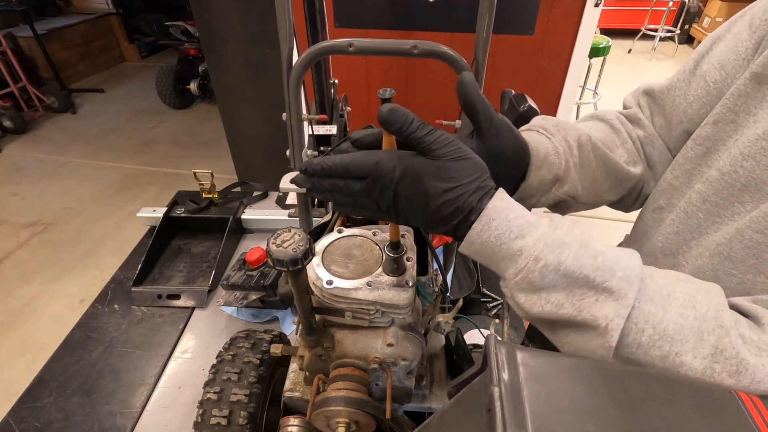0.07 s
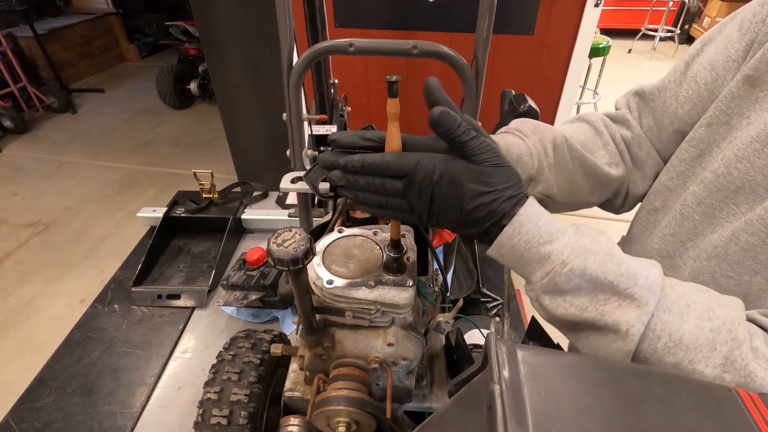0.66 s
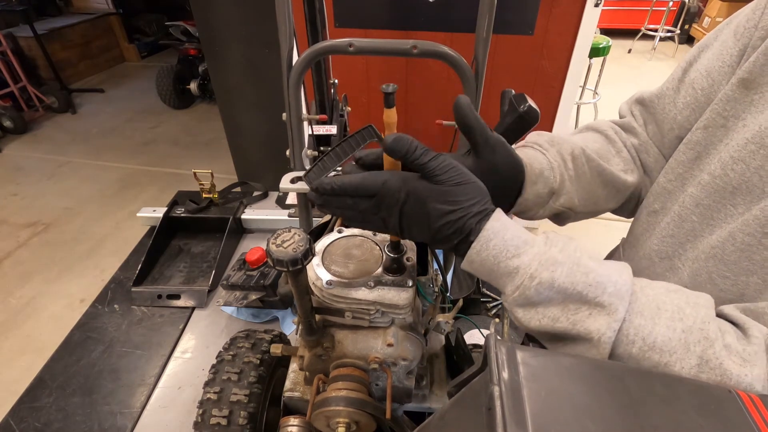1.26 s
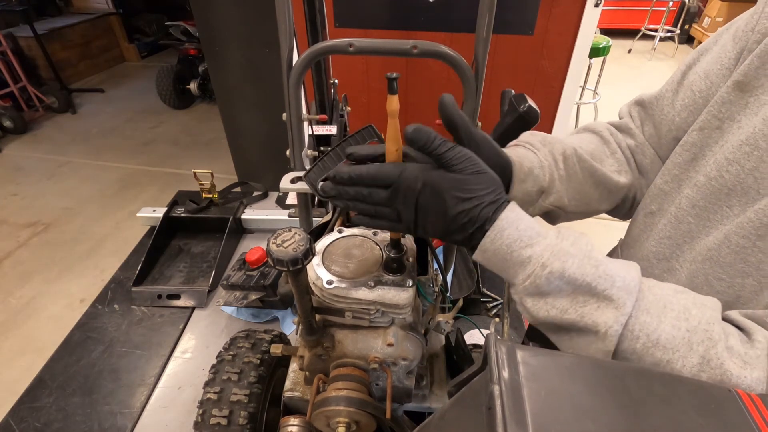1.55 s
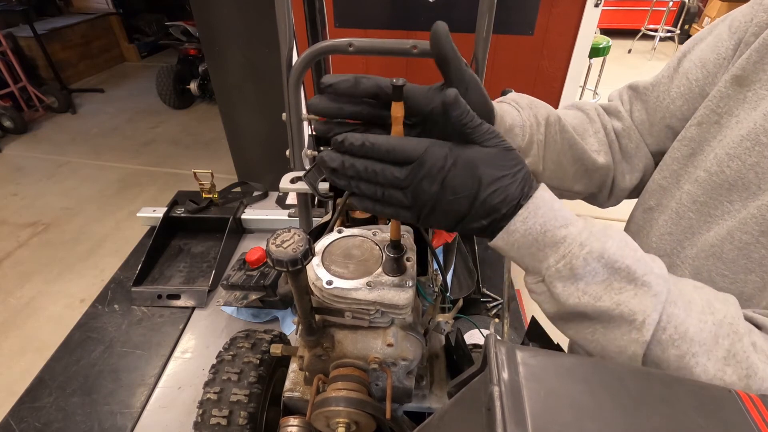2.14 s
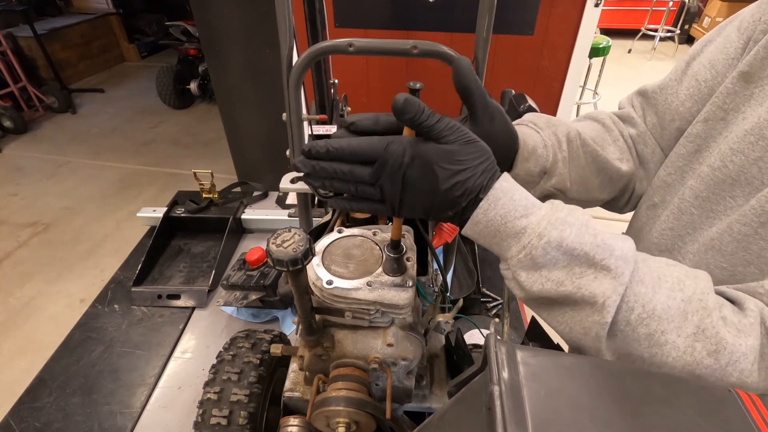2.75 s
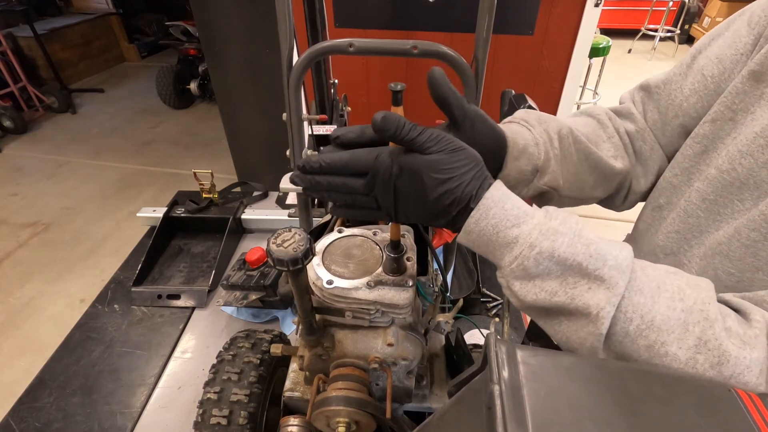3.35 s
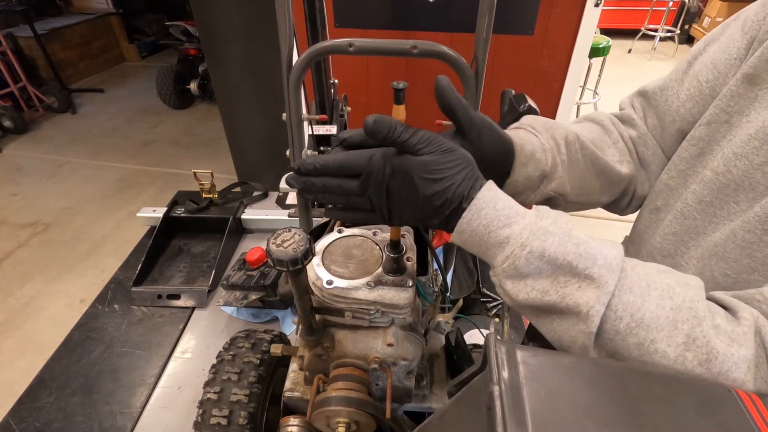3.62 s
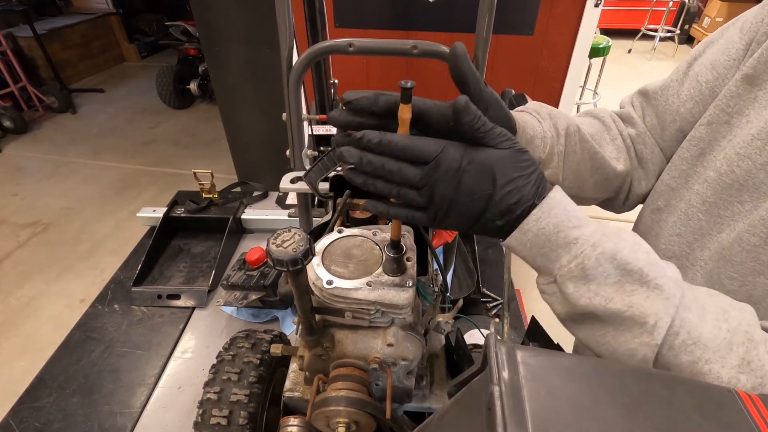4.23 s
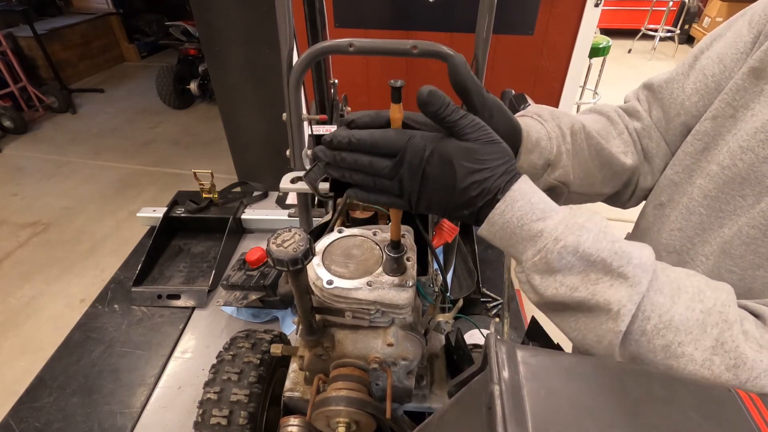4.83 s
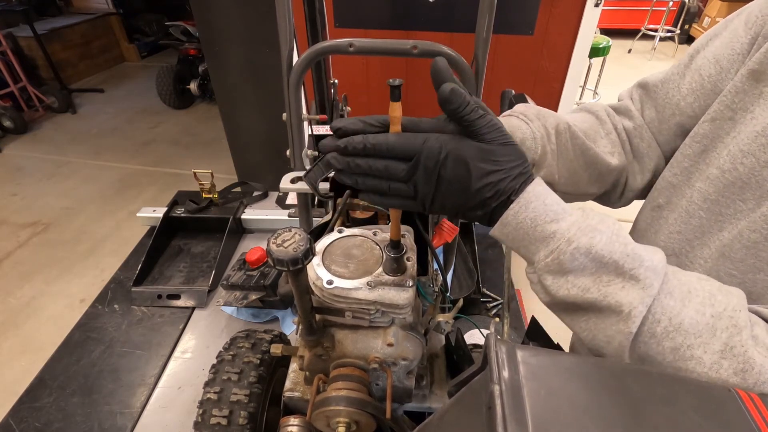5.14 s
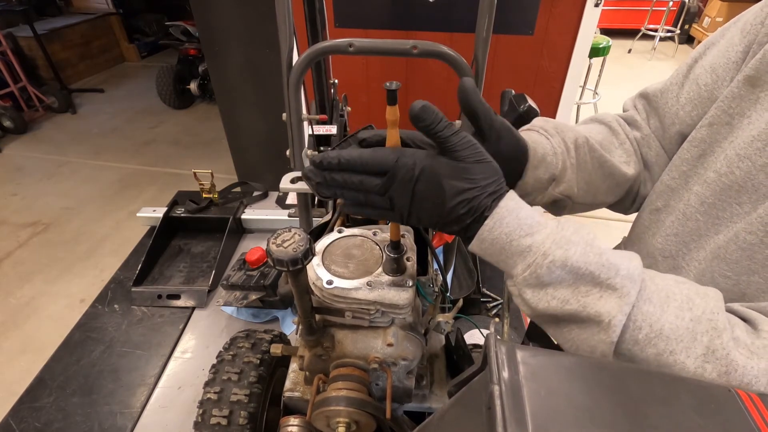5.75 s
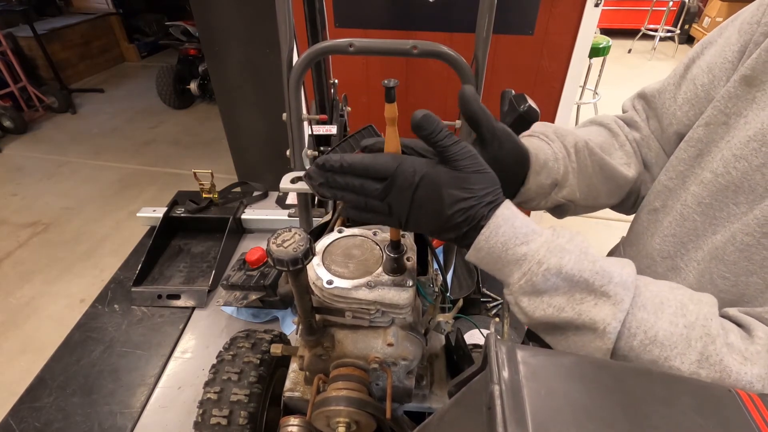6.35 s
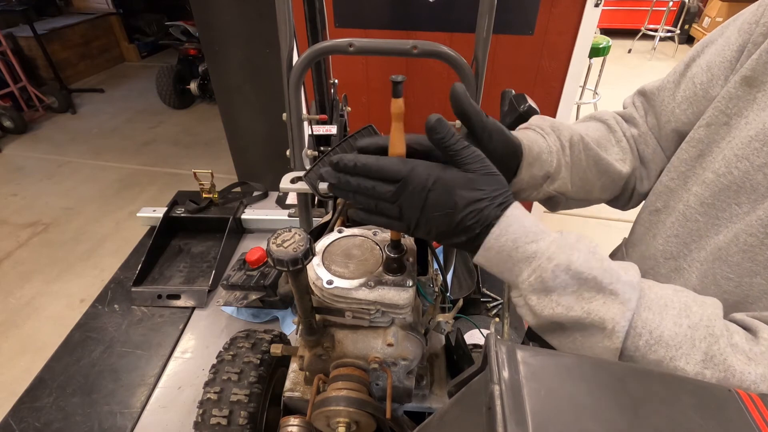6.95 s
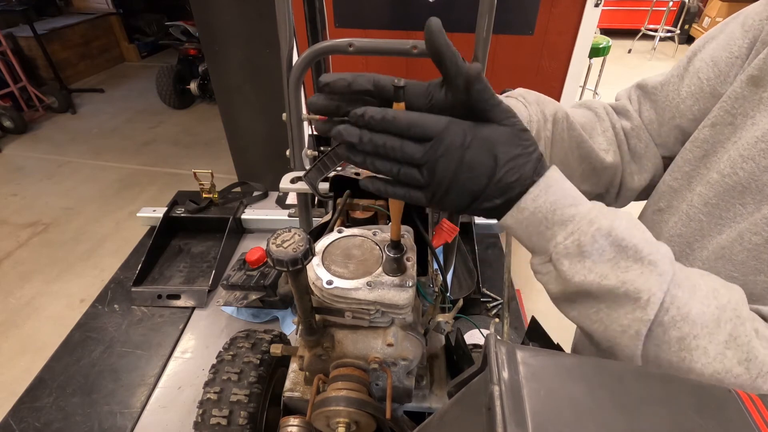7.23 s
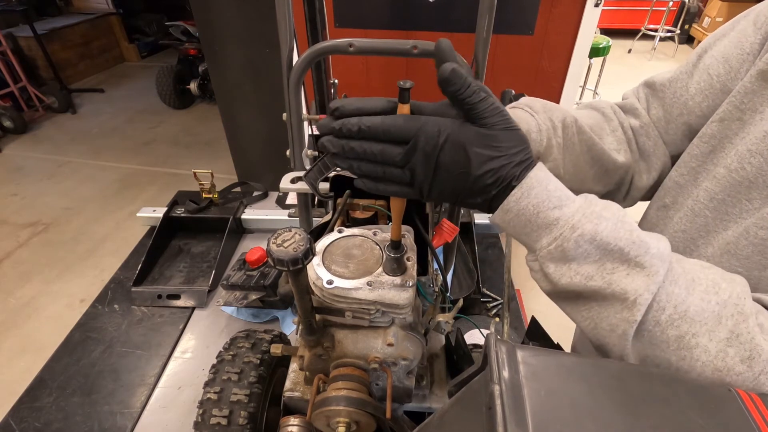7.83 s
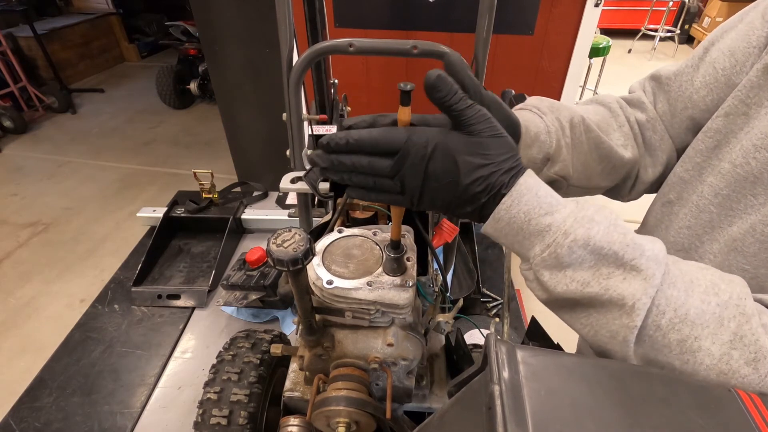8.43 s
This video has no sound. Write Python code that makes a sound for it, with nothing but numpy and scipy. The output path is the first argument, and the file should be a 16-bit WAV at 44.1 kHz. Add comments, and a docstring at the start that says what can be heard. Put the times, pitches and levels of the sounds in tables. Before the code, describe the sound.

An engine valve is ground by hand against its seat, close to the microphone in a quiet workshop. Gritty metallic scraping goes back and forth at about eight or nine strokes a second, ringing slightly in the engine block. It starts fairly smooth, with a soft low knock and faint rumble of the rocking machine around 1 second, and stops at 2 seconds. A few light ticks and a sharper click lead into coarser, brighter grinding from 2.6 seconds, which gradually wears finer. A second pause at about 4.1 seconds holds small ticks. The scraping returns at 4.6 with a soft crunch and faint high squeak, smoothing out until 7.1. After more ticks and another small crunch, sharp grinding resumes at 7.6 and continues to the end, near 8.7 seconds. Gloves rustle very faintly in the pauses, with a short room tail and slight hiss behind.

```python
"""Gritty to-and-fro scraping, close to a stereo microphone in a workshop: an engine valve lapped by hand.
A stick spun between the palms turns the valve; each stroke drags grinding compound over the seat and
rings the engine block, and the grit wears finer through a spell. In three short breaks the valve is
lifted and reseated with small ticks, then crunches and squeaks on fresh grains. Underneath, the machine
rocks under the hands; behind it are the room's short tail and a faint hiss."""
import sys
import numpy as np
from scipy import signal
from scipy.fft import rfft, irfft, next_fast_len
from scipy.io import wavfile
from scipy.ndimage import uniform_filter1d, map_coordinates

SR = 44100
rng = np.random.default_rng(int(sys.argv[2]) if len(sys.argv) > 2 else 0)


def wav_out(sig):
    """Save sig, one row per channel (or a flat mono array), as 16-bit PCM at SR to the path in sys.argv[1]."""
    wavfile.write(sys.argv[1], SR, np.round(np.clip(np.atleast_2d(sig).T, -1, 1) * 32767).astype(np.int16))


N = 382347


def amp(db):
    return 10 ** (np.asarray(db) / 20)


def unit_rms(x):
    return x / np.sqrt(np.mean(x ** 2) + 1e-20)


def along(points, hz):
    """Read (freq_hz, value) points at hz, on a log frequency axis."""
    freqs, values = np.transpose(points)
    return np.interp(np.log(hz + 1), np.log(freqs + 1), values)


def filtered(x, response):
    """Pass x through a response given as a function of frequency."""
    size = next_fast_len(N + SR // 2)
    return irfft(rfft(x, size) * response(np.fft.rfftfreq(size, 1 / SR)), size)[..., :N]


def coloured(x, spectrum):
    """Shape x by (freq_hz, gain_db) points."""
    return filtered(x, lambda hz: amp(along(spectrum, hz)))


def noise(spectrum):
    """Coloured noise of rms 1."""
    return unit_rms(coloured(rng.standard_normal(N), spectrum))


def wobble(rate):
    """A smooth random curve, rate knots a second."""
    return map_coordinates(rng.standard_normal(int(N * rate / SR) + 4), [np.arange(N) * rate / SR])


def add(track, start_s, sound):
    """Mix a sound in from start_s."""
    start = round(start_s * SR)
    sound = sound[max(-start, 0):]
    part = track[max(start, 0):][:len(sound)]
    part += sound[:len(part)]


def gestures(rows, attack_s, release_share=0.51):
    """Gain for (start_s, length_s, level_db) rows: each rises, holds and dies over a share of its length."""
    t = np.arange(N) / SR
    return sum(amp(db) * np.interp(t - s, [-attack_s, 0, length, length * (1 + release_share)], [0, 1, 1, 0])
               for s, length, db in rows)


# The workshop's steady background: freq_hz, level_db
ROOM_TONE = [(25, -3.5), (200, 0), (400, -13), (800, -14.5), (1500, -10), (3000, -21.5), (8000, -29.5),
             (11000, -39), (15000, -53)]
def room_tone():
    """A faint low rush and hiss all round the microphone, partly shared by both channels."""
    hiss = unit_rms(coloured(rng.standard_normal((3, N)), ROOM_TONE))
    return amp(-71.0) * (hiss[0] + hiss[1:])


# Colour of the sound coming back from the room: freq_hz, gain_db
ROOM_COLOUR = [(200, -6.5), (2000, -11), (4000, -11.5), (7000, -11.5), (12000, -10)]
# Decay of the room: freq_hz, t60_s
ROOM_DECAY = [(200, 1), (1000, 0.56), (2500, 0.52), (6000, 0.61), (10000, 0.37), (14000, 0.4)]
def workshop_tail(source, hop=16384):
    """A smooth, diffuse room tail in which the treble dies first."""
    out = np.zeros((2, N))
    padded = np.pad(coloured(source, ROOM_COLOUR), (hop, 2 * hop))
    for start in range(0, N + hop, hop):
        hz, t, bins = signal.stft(rng.standard_normal((2, 2 * hop)), SR, nperseg=256)
        decay = amp(-60 * t / along(ROOM_DECAY, hz)[:, None])
        tail = signal.istft(bins * decay, SR, nperseg=256)[1]
        tail = tail + 0.41 * tail[::-1]  # each side hears some of the other
        piece = padded[start:start + 2 * hop] * np.sqrt(np.hanning(2 * hop))
        wet = signal.fftconvolve(piece[None], tail / np.linalg.norm(tail[0]), axes=1)
        for channel, sound in zip(out, wet[:, max(hop - start, 0):]):
            add(channel, max(start - hop, 0) / SR + 0.003, sound)
    return out


def near_reflections(source, count=8, span_s=0.0072):
    """Faint early copies of the treble, different on each side, widen the scraping."""
    echoes = np.zeros((2, int(span_s * SR)))
    for channel in echoes:
        signs = rng.choice([-1, 1], count)
        delays = rng.integers(len(channel) // 10, len(channel), count)
        channel[delays] = signs / np.sqrt(count)
    treble = coloured(source, [(1500, -7.5), (4000, 9.0), (8000, -2), (13000, 7.0)])
    return amp(-13.5) * signal.oaconvolve(treble[None], echoes, axes=1)[:, :N]


# Balance at the microphone: freq_hz, left_over_right_db
MIC_BALANCE = [(60, 1), (110, -2), (200, -3), (380, -3), (700, 0), (1290, -2), (2380, 1), (4400, 0),
               (8120, -0.5), (15000, -4.5)]
# Phase between its two sides: freq_hz, right_lead_rad
MIC_LEAD = [(100, 0.35), (300, 1), (800, 0.3), (2000, 0.57), (3300, 0.5), (5200, 0.95), (6800, 0.13),
            (15000, .05)]
def direct_path(source):
    """From close by, the sound reaches the right side of the microphone slightly earlier."""
    def response(hz):
        left = amp(along(MIC_BALANCE, hz) / 2) * np.exp(-0.5j * along(MIC_LEAD, hz))
        return np.array([left, 1 / left])
    return filtered(source, response)


# The hands push on the machine: start_s, length_s, sway_db, panel_db
PUSHES = [(0.024, .32, -65, -62), (.92, .06, -54.5, -69), (1.051, 0.062, -62, -47.5),
          (1.15, 0.74, -46, -69), (1.848, 0.15, -63, -63), (2.712, 0.17, -59.5, -61),
          (3.97, 0.16, -61.5, -74), (4.702, 0.1, -63.5, -66), (5.567, 0.059, -66, -67),
          (7.094, 0.15, -61, -70.5), (7.603, 0.33, -76, -66)]
# Rumble of the swaying machine: freq_hz, level_db
SWAY_SPECTRUM = [(15, -22), (33, -20.5), (39, 5.5), (45, -14.5), (70, -13), (100, -23), (200, -69),
                 (500, -120)]
# Drone of its panels: freq_hz, level_db
PANEL_SPECTRUM = [(30, -31), (80, -30), (130, -8), (175, 0), (216, -1), (250, -4), (330, -13.5),
                  (480, -14.5), (900, -26), (2500, -120)]
# Soft knocks on the frame: start_s, level_db
KNOCKS = [(0.062, -47), (.32, -46), (1.041, -36)]
# Resonances of the frame: pitch_hz, level_db, t60_s
FRAME_MODES = [(168, 7, 0.07), (216.8, 1, 0.36), (270, -5, 0.14), (375, -9, 0.27)]
def machine_rocking(sway_rest_db=-71.5, panel_rest_db=-69, push_attack_s=0.038, knock_rise_s=0.028):
    """Under the hands the machine sways, its panels drone faintly, and soft knocks ring the frame."""
    starts, lengths, sway_db, panel_db = np.transpose(PUSHES)
    sway = np.hypot(amp(sway_rest_db), gestures(zip(starts, lengths, sway_db), push_attack_s))
    panel = np.hypot(amp(panel_rest_db), gestures(zip(starts, lengths, panel_db), push_attack_s))
    out = sway * noise(SWAY_SPECTRUM) + panel * noise(PANEL_SPECTRUM)
    t = np.arange(SR // 2) / SR
    ring = sum(amp(db - 60 * t / t60) * np.sin(2 * np.pi * hz * t) for hz, db, t60 in FRAME_MODES)
    for start_s, level_db in KNOCKS:
        add(out, start_s, amp(level_db) * ring * (1 - np.exp(-t / knock_rise_s)))
    return out


# The gloves shift in each break: start_s, length_s, level_db
GLOVE_RUBS = [(2.41, 0.04, -67.5), (2.48, 0.089, -67), (4.465, 0.22, -72), (7.462, 0.023, -69.5),
              (7.51, .04, -75)]
def glove_rubs():
    """Gloves slide on the stick with a faint, uneven rustle."""
    rustle = noise([(100, -59), (600, -11), (2000, 3), (4500, -11), (9000, -8.5), (11000, -22), (14000, -39)])
    return rustle * amp(1.9 * wobble(90)) * gestures(GLOVE_RUBS, attack_s=0.0075)


# Broad response of the engine block: freq_hz, gain_db
BLOCK_RESPONSE = [(330, -31), (450, -26.5), (650, -23), (900, -16), (1250, -3.5), (1800, 1), (2800, -3.5),
                  (3400, -13.5), (4600, -19.5), (5500, -25), (6800, -25.5), (8000, -31.5), (11000, -39.5),
                  (15000, -43)]
# Resonances of block and valve: pitch_hz, width_hz, above_response_db
BLOCK_MODES = [(760.8, 11.8, 18.5), (902, 41, 15.5), (1022, 54, 13), (1294, 48, 5.5), (1454, 42, 5),
               (1626, 5.9, 11.5), (1748, 50, 10), (1846, 26, 8.5), (2007, 127, 10), (2258, 8.4, 11.5),
               (2470, 40, 8), (2663, 40, 6.5), (2878, 73, 6.5), (2990, 51, 11), (3180, 11, 10),
               (3613, 27, 12), (4027, 77, 10.5), (4414, 38, 13), (4532, 47, 12.5), (4830, 35, 12.5),
               (5060, 260, 8), (5923, 65, 15), (6280, 140, 11), (7042, 270, 9), (9400, 860, 13.5),
               (12120, 750, 11)]
def block_ring(low_hz, high_hz, size=8192, order=10):
    """The block's answer, of energy 1, to one grain that drives the given band."""
    hz = np.fft.rfftfreq(size, 1 / SR) + 1
    peaks = 1 + sum((amp(db) ** 2 - 1) / (1 + (2 * (hz - pitch) / width) ** 2)
                    for pitch, width, db in BLOCK_MODES)
    band = 1 / (1 + (low_hz / hz) ** order) / (1 + (hz / high_hz) ** order)
    gain = amp(along(BLOCK_RESPONSE, hz)) * np.sqrt(np.abs(peaks) * band)
    cepstrum = irfft(np.log(gain + 1e-6))
    cepstrum[1:size // 2] *= 2  # causal: it rings only after the blow
    cepstrum[size // 2 + 1:] = 0
    ring = irfft(np.exp(rfft(cepstrum)))
    return ring / np.linalg.norm(ring)


# Light contacts of valve and stick: start_s, peak_db, treble_db
TICKS = [(2.211, -63, 4), (2.299, -58, -17), (2.376, -45.5, -14), (2.426, -44.5, 7), (2.509, -55, -16),
         (2.561, -31, -12.5), (4.221, -43.5, -18), (4.562, -51, -5), (7.468, -50, 12), (7.506, -46, -11),
         (7.553, -37, -17)]
def valve_ticks(click_t60_s=0.008, skid_t60_s=0.11):
    """The valve touches down with a click and a short gritty skid, which ring the block."""
    out, t = np.zeros(N), np.arange(SR // 10) / SR
    body, edge = block_ring(430, 3600), block_ring(5300, 10000)
    envelope = 1.3 * amp(-60 * t / click_t60_s) + amp(-60 * t / skid_t60_s)
    for start_s, peak_db, treble_db in TICKS:
        contact = rng.standard_normal(len(t)) * envelope
        tick = signal.fftconvolve(contact, body + amp(treble_db) * edge)
        add(out, start_s, amp(peak_db) * tick / np.abs(tick).max())
    return out


# The valve settles on fresh compound: middle_s, length_s, crunch_db, squeak_db
CRUSHES = [(1.877, 0.36, -49, -56), (2.633, .18, -53, -52), (4.673, 0.18, -48, -47),
           (7.627, 0.16, -43.5, -46.5), (7.774, 0.3, -53, -65)]
# Crunch of breaking grains: freq_hz, level_db
CRUNCH_SPECTRUM = [(60, -65), (170, -29), (260, 0.5), (400, -10), (580, 0), (720, 8), (1000, -22),
                   (2500, -120)]
def grain_crushing(slips=10, slip_s=0.0098, squeak_hz=9220):
    """Fresh coarse grains break with a low crunch and squeak in short slips against the steel."""
    pressure, squeaks = np.zeros((2, N))
    slip_size = int(slip_s * SR)
    for middle_s, length_s, crunch_db, squeak_db in CRUSHES:
        add(pressure, middle_s - length_s / 2, amp(crunch_db) * np.hanning(int(length_s * SR)))
        scatter = rng.standard_normal((slips, 3))
        for place, (late, detune, strength) in zip(np.linspace(-0.4, 0.3, slips), scatter):
            ragged_hz = squeak_hz * (1 + 0.012 * detune + 0.12 * rng.standard_normal(slip_size))
            slip = np.hanning(slip_size) * np.sin(2 * np.pi * np.cumsum(ragged_hz) / SR)
            gain = amp(squeak_db + 7.5 + 1.8 * strength) * np.cos(np.pi * place) ** 2
            add(squeaks, middle_s + place * length_s + 0.0034 * late, gain * slip)
    return pressure * noise(CRUNCH_SPECTRUM) + squeaks


def grit(per_s, spread_db, smear):
    """Grains crack at random over a smear of finer paste; none is much above the usual size."""
    sizes = amp(spread_db * np.minimum(rng.standard_normal(N), 1))
    cracks = (rng.random(N) < per_s / SR) * rng.choice([-1, 1], N) * sizes
    return unit_rms(unit_rms(cracks) + smear * rng.standard_normal(N))


def contact_drift(scrape, depth_db, size=512):
    """The colour shifts in patches as the contact moves round the seat, while the loudness holds."""
    bins = signal.stft(scrape, nperseg=size)[2]
    patches = uniform_filter1d(rng.standard_normal(bins.shape), size=3, axis=0)  # across frequency
    patches = uniform_filter1d(patches, size=7, axis=1)  # across time
    patches -= uniform_filter1d(patches, size=13, axis=0)  # broad bands keep their level
    return signal.istft(bins * amp(depth_db * unit_rms(patches)), nperseg=size)[1][:N]


# Turns of the valve, each lasting until the next in its spell: start_s, pressure_db
STROKES = [(-.09, 10), (0.019, 0.5), (.133, .6), (0.262, 1), (0.375, 1), (0.506, 0.4), (.623, -0.5),
           (0.748, 0.5), (.866, 0.8), (0.993, 1.5), (1.113, .2), (1.231, -1), (1.341, -0.5), (1.457, -0.2),
           (1.564, -1.5), (1.681, -0.5), (1.792, -0.6), (1.922, -12.5), (2.56, -3), (2.729, -0.4),
           (2.854, 0.5), (2.963, -1), (3.071, -0.3), (3.185, 0.2), (3.291, 0.3), (3.419, 0), (3.519, 1.3),
           (3.644, 1.6), (3.758, 0.5), (3.867, 1), (3.962, -1.6), (4.088, -8.5), (4.584, -3.5), (4.778, -1),
           (4.896, -1), (5.006, -1), (5.121, 0), (5.246, 0), (5.362, 0.3), (5.481, -0.6), (5.585, -0.7),
           (5.703, -.3), (5.817, 0.8), (5.939, -.8), (6.045, -0.5), (6.162, -1.3), (6.271, 0), (6.399, 1),
           (6.505, -0.4), (6.607, 0), (6.714, -0.7), (6.815, -0.5), (6.915, -2), (7.038, -10.5),
           (7.553, -5), (7.721, -1.3), (7.843, -1.5), (7.962, 0.3), (8.071, -0.5), (8.211, 0.5),
           (8.317, -0.6), (8.446, -0.1), (8.564, 0)]
# Spells of turns between breaks; the sharp share of the grit falls to 1/e in wear_turns:
# sharp_share, wear_turns, renewed_share, last_turn_s, sizzle_db
SPELLS = [(0.047, 9.2, 0.84, 0.085, 4.5), (0.93, 17.8, 0.23, 0.071, 0), (0.89, 9, 0.18, 0.12, 0),
          (0.99, 15, 0, 0.14, -1.5)]
# The valve breaks loose, runs and slows to rest: stroke_share, level_db
SWING = [(0, -3), (.03, -0.5), (.12, 1.2), (.3, 2.5), (.55, 1.53), (.69, -2), (.8, -8.5), (.9, -24.5),
         (1, -15.5)]
# The first turn after a break swells as the hands bear down: stroke_share, level_db
FIRST_SWING = [(0, -15.5), (.12, -1.5), (.3, 3), (.66, 5), (.84, -3.5), (1, -23)]
def turns(break_s=0.3, lift_turns=3.36, renew_turns=2.2):
    """Yield each turn: the grit dulls, then new compound runs in as the valve lifts before a break."""
    strokes = np.array(STROKES)
    spells = np.split(strokes, np.flatnonzero(np.diff(strokes[:, 0]) > break_s) + 1)
    for spell, (sharp_at_start, wear_turns, renewed, last_turn_s, sizzle_db) in zip(spells, SPELLS):
        lengths = np.append(np.diff(spell[:, 0]), last_turn_s)
        for k, ((start_s, pressure_db), length_s) in enumerate(zip(spell, lengths)):
            turns_left = len(spell) - 1 - k
            fresh = renewed * np.clip((lift_turns - turns_left) / renew_turns, 0, 1)
            sharp = sharp_at_start * np.exp(-k / wear_turns)
            sharp += (1 - sharp) * fresh
            swing = FIRST_SWING if k == 0 and start_s > break_s else SWING
            yield start_s, length_s, pressure_db, swing, sharp, fresh, sizzle_db


# The highest hiss, first to dip as the turn slows: stroke_share, gain_db
SIZZLE_SHAPE = [(0, -.5), (.45, 2.5), (.72, -7.5), (1, 9)]
def lapping(forward_db=0.8, darken_db=5, fresh_db=3.5, fine_slope=1.43, sizzle_slope=1.3):
    """Each turn drags grit over the seat: hiss follows the speed most steeply; slowing darkens it."""
    coarse, middle, fine, sizzle = np.zeros((4, N))
    grades = np.array([(-29, -51.5), (-29.5, -36), (-41, -40), (-68, -67.5)])  # sharp_db, worn_db
    for k, (start_s, length_s, pressure_db, swing, sharp, fresh, spell_db) in enumerate(turns()):
        share = np.linspace(0, 1, int(length_s * SR))
        drive_db = pressure_db + np.interp(share, *np.transpose(swing))  # pressure and speed
        coarse_db, middle_db, fine_db, sizzle_db = grades @ [sharp, 1 - sharp]
        coarse_db += fresh_db * fresh  # new compound rolls under the lifted valve
        coarse_db += -forward_db if k % 2 else forward_db  # forward turns drag more coarse grit
        sizzle_db += spell_db + np.interp(share, *np.transpose(SIZZLE_SHAPE))
        add(coarse, start_s, amp(coarse_db + drive_db + darken_db * (share - 0.71)))
        add(middle, start_s, amp(middle_db + drive_db))
        add(fine, start_s, amp(fine_db + fine_slope * drive_db))
        add(sizzle, start_s, amp(sizzle_db + sizzle_slope * drive_db))
    chatter = amp(0.9 * wobble(70) + 0.5 * wobble(330))  # the valve rides unevenly on the grains
    rasp = unit_rms(chatter * grit(per_s=4000, spread_db=4.0, smear=0.51))
    crackle = unit_rms(rasp + 0.48 * grit(per_s=900, spread_db=0.0, smear=0.68))
    fizz = unit_rms(rasp + 1.8 * grit(per_s=1100, spread_db=-1.0, smear=0.36))
    grind = unit_rms(chatter * grit(per_s=3000, spread_db=2.5, smear=0.53))
    layers = [(coarse * grind, block_ring(285, 1625)),
              (amp(-1.43) * middle * rasp, block_ring(1375, 3100)),
              (amp(0.58) * fine * crackle, block_ring(3078, 10320, order=12)),
              (amp(3.0) * sizzle * fizz, block_ring(10270, 20000, order=24))]
    scrape = sum(signal.oaconvolve(force, ring)[:N] for force, ring in layers)
    return contact_drift(scrape, depth_db=2.0)


def scene():
    """The work at the engine, close to the microphone, with the workshop behind it."""
    work = lapping() + grain_crushing() + valve_ticks() + glove_rubs() + machine_rocking()
    return room_tone() + workshop_tail(work) + near_reflections(work) + direct_path(work)


def record(dry, top_hz=15200):
    """The recorder keeps nothing above its band limit."""
    return filtered(dry, lambda hz: hz < top_hz)


dry = scene()
out = record(dry)
wav_out(out)
```